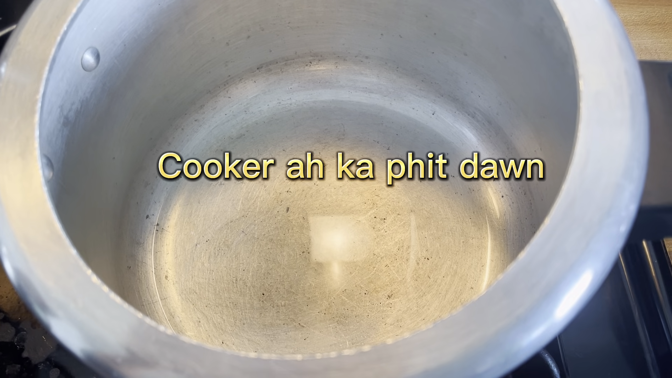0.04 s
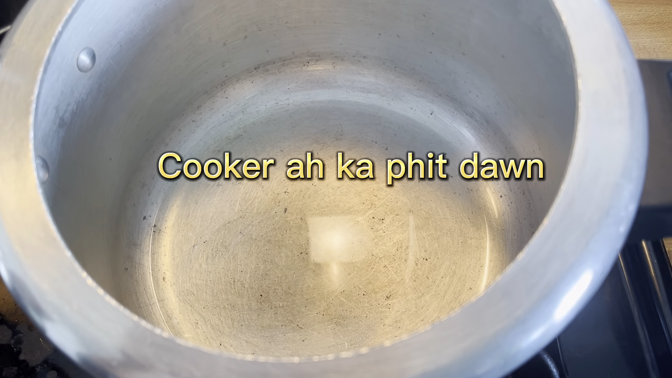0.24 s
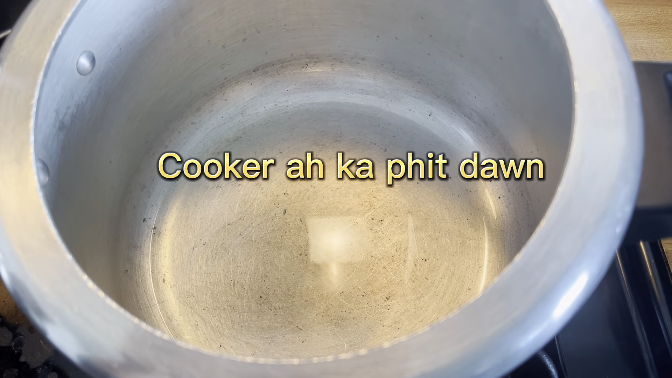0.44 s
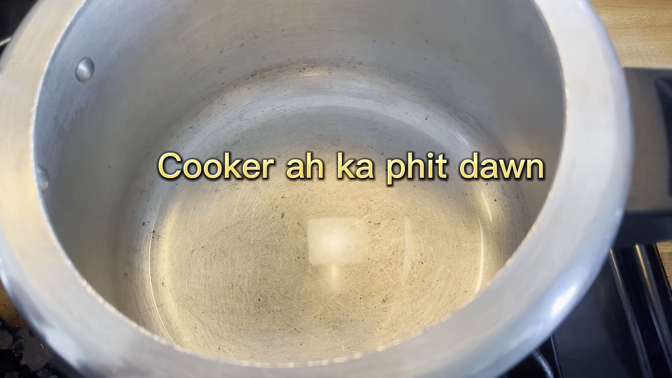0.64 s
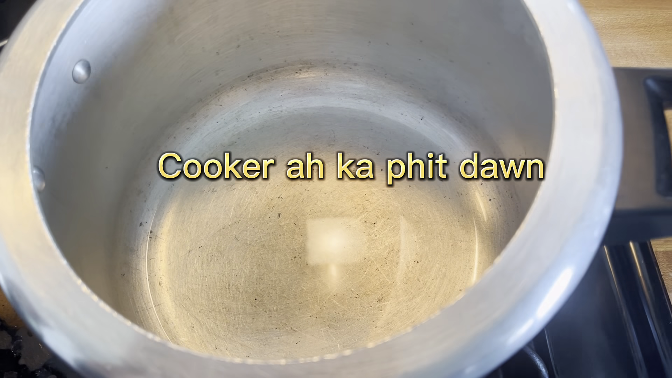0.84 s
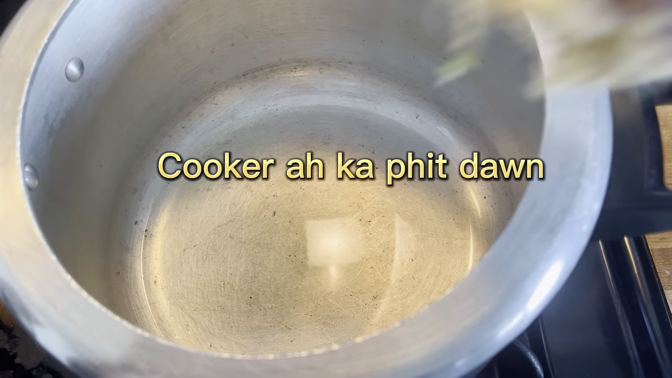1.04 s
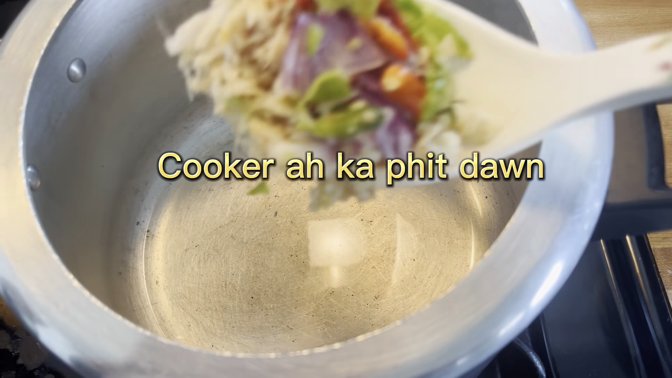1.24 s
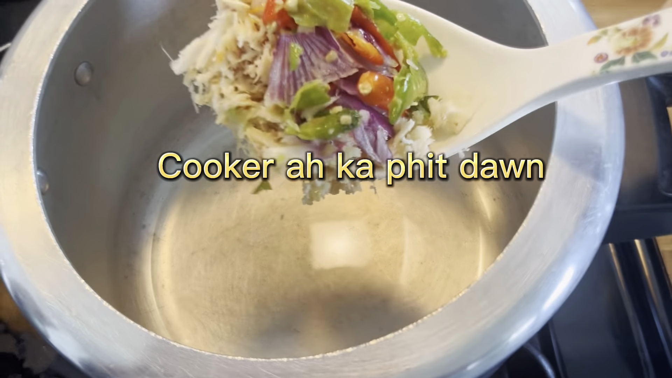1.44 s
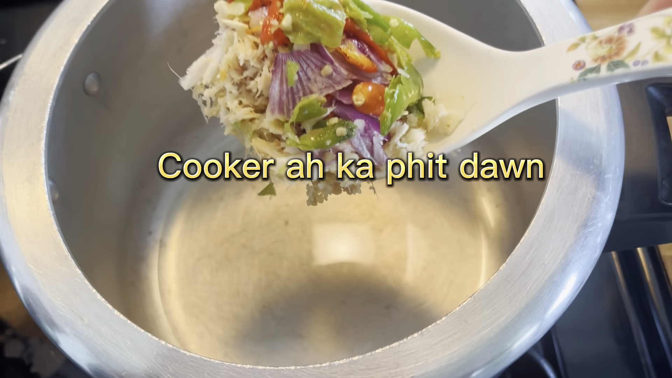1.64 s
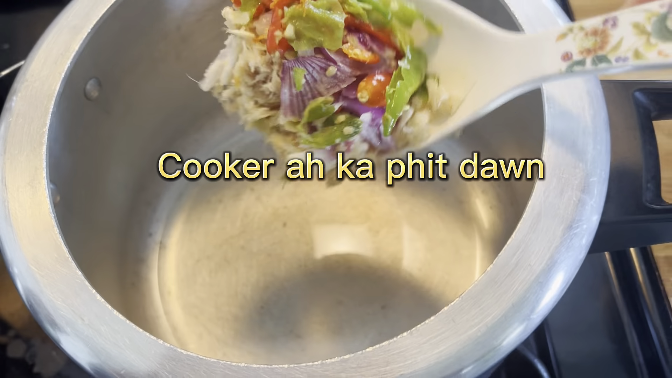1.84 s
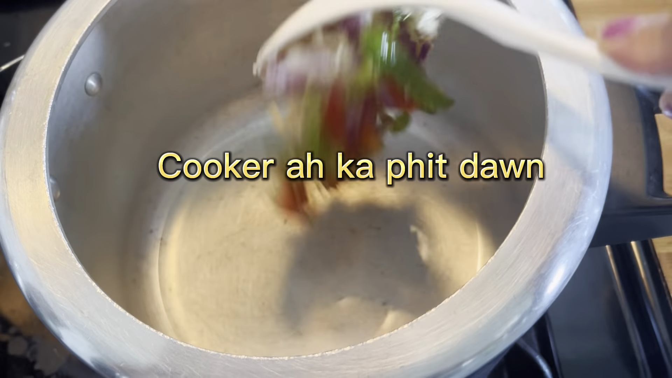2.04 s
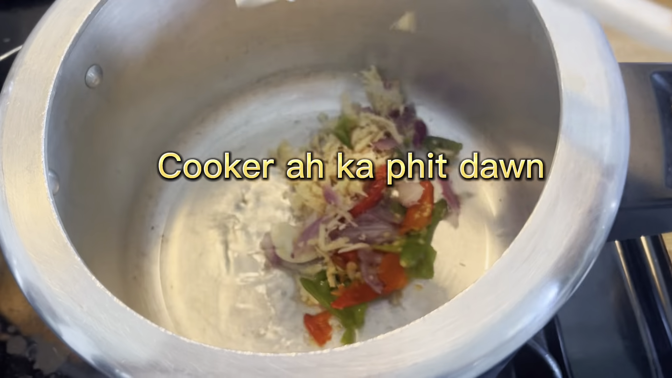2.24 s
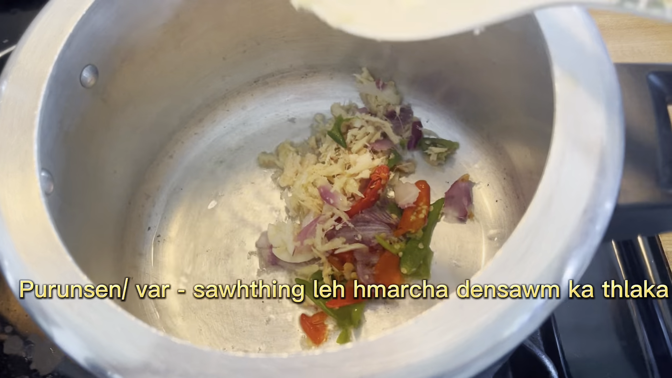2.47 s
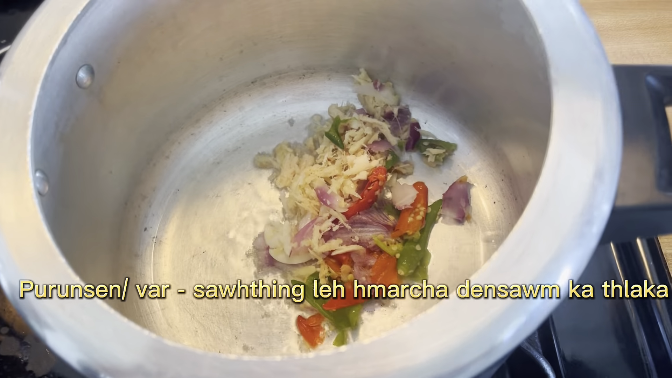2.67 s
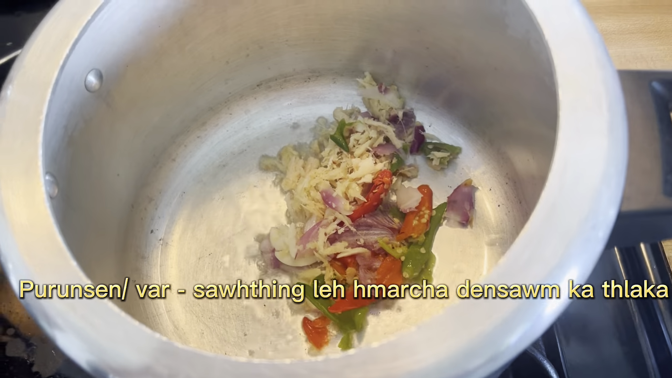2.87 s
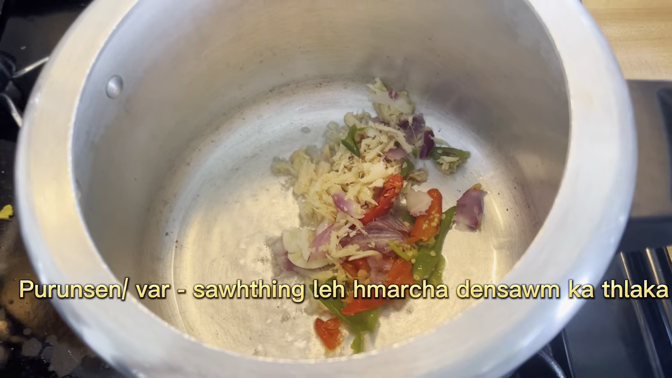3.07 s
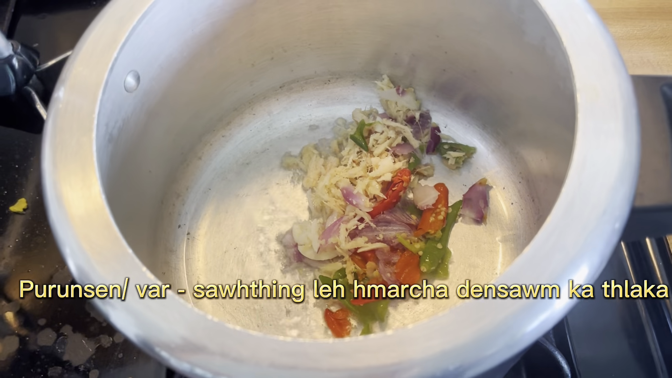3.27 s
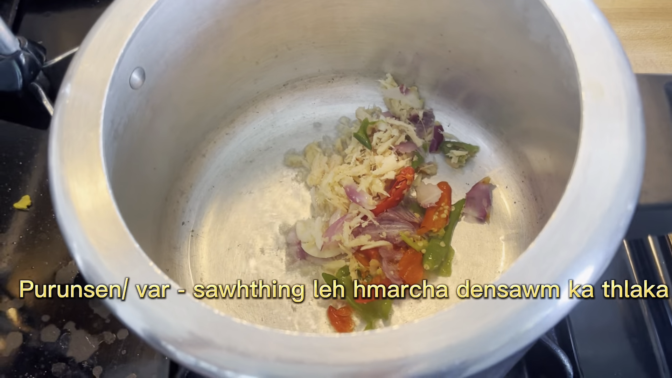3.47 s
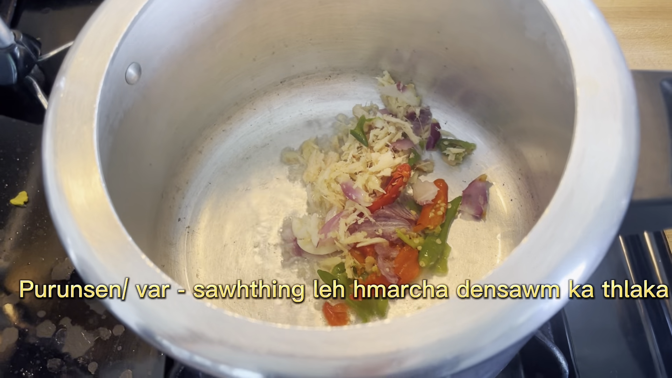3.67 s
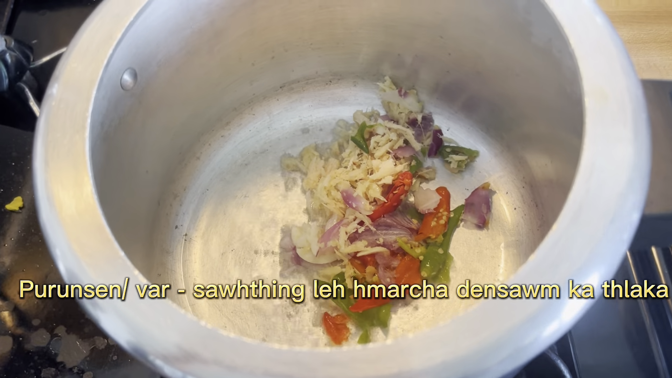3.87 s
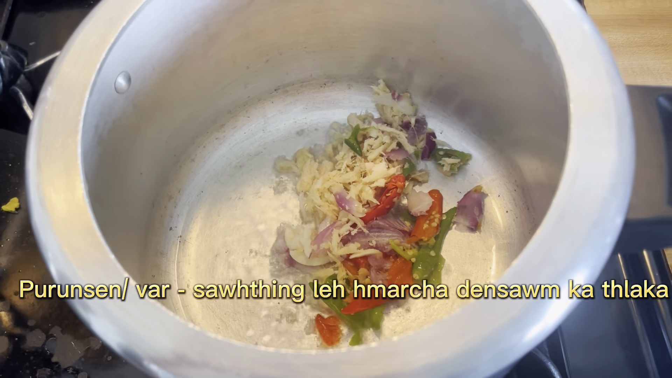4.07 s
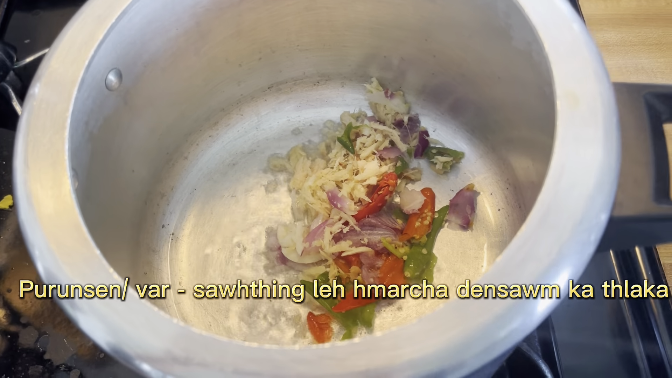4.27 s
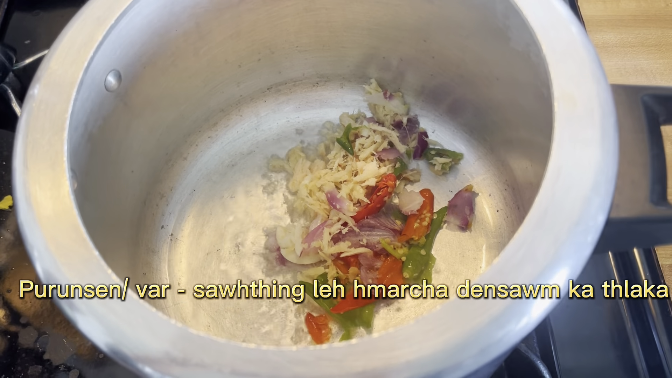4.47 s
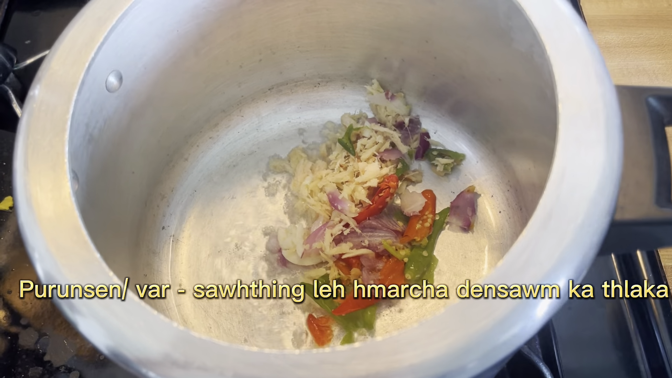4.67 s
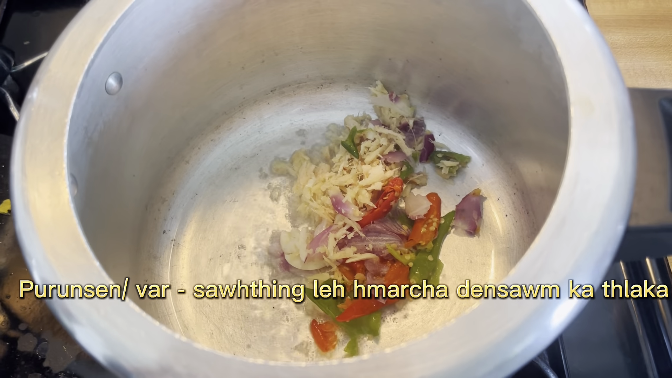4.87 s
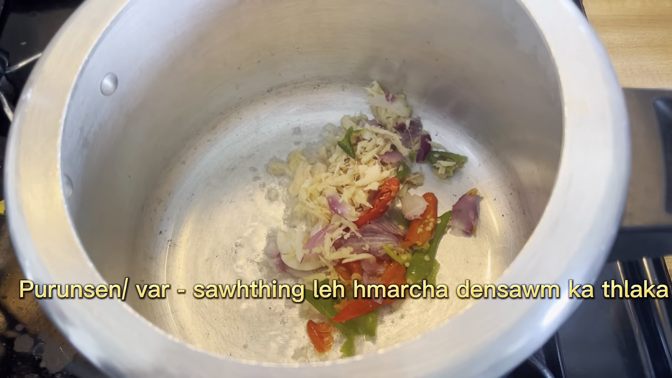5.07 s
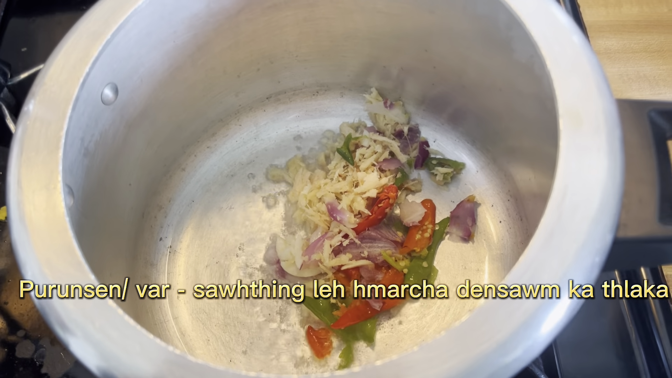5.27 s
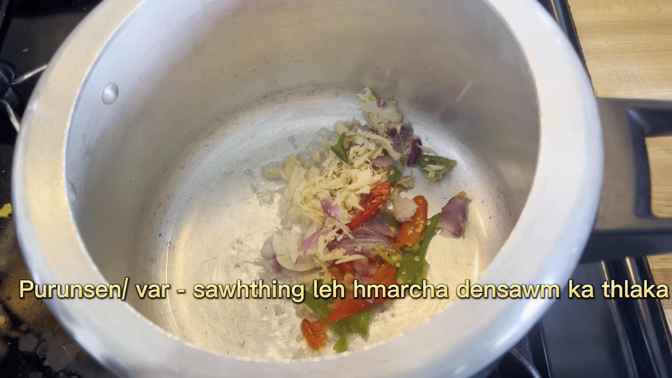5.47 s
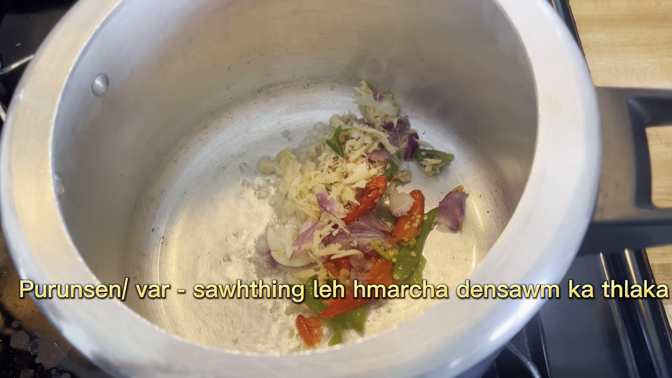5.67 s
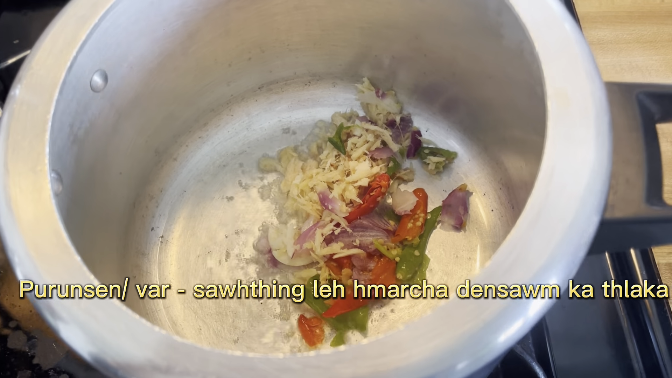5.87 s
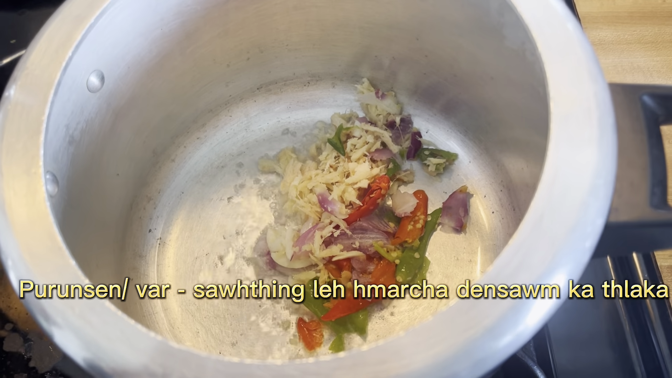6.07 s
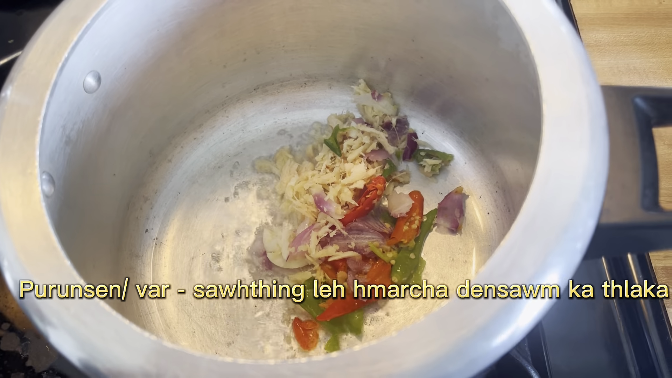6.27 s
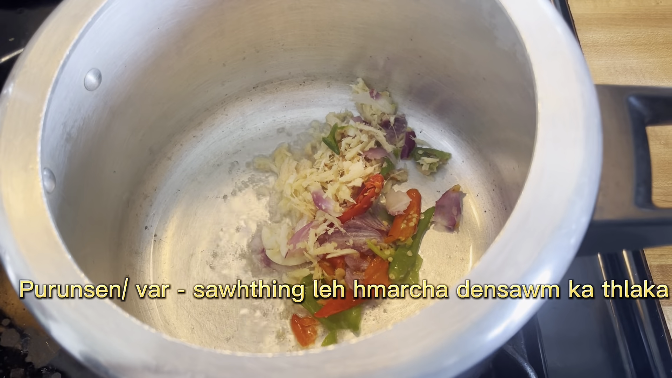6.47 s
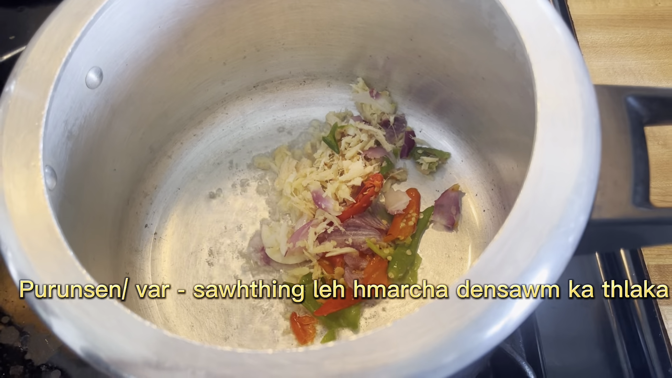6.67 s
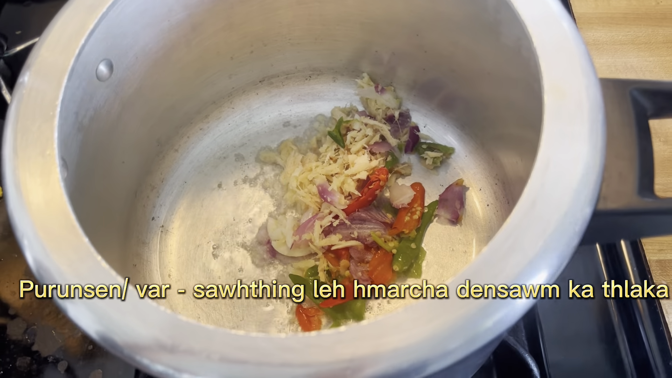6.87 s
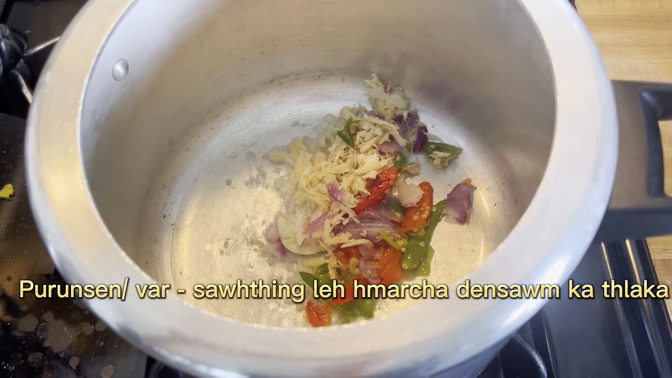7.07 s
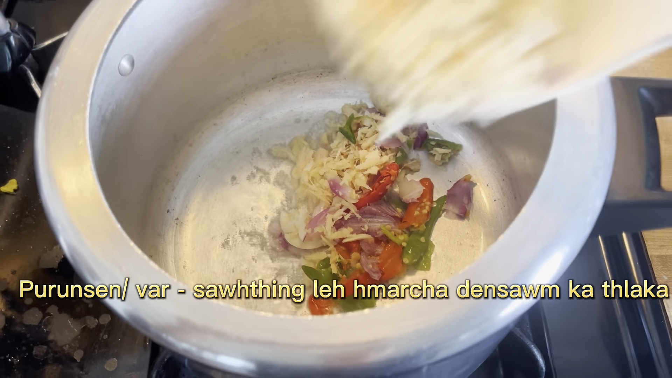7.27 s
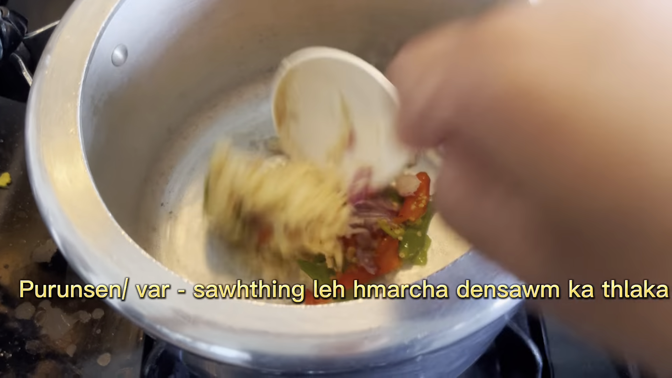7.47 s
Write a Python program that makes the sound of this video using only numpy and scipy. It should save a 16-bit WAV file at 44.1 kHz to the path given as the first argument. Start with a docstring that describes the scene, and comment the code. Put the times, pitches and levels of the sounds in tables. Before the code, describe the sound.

A gas burner roars softly, then chopped vegetables drop into hot oil in a metal pot and sizzle brightly, spitting and popping.

```python
"""Vegetables hit hot oil

A gas burner roars softly under a metal pot of hot oil; something ticks nearby. Chopped vegetables drop in
with a rush of steam and fry: thousands of bubbles burst, spit and pop, and the air in the pot rings with
them. A spoon scrapes now and then. Two close microphone ports hear it, with a shrill peak near 10 kHz."""
import sys
import numpy as np
from scipy import signal
from scipy.fft import rfft, irfft, next_fast_len
from scipy.io import wavfile

SR = 44100
rng = np.random.default_rng(int(sys.argv[2]) if len(sys.argv) > 2 else 0)


def bounce(signal):
    """Save signal as a 16-bit WAV file at the path given by the first command-line argument."""
    frames = np.transpose(np.atleast_2d(signal))
    limited = np.clip(frames, -1, 1)
    pcm = np.round(limited * 32767).astype(np.int16)
    wavfile.write(sys.argv[1], SR, pcm)


N = 331632
SIZE = next_fast_len(N + 8192)
HZ = np.fft.rfftfreq(SIZE, 1 / SR)

# Sizzle envelope, from the moment the food lands: (time [s], fizz above 7 kHz [dB], body 2-7 kHz [dB])
SIZZLE_LEVELS = [(2.0905, -25, -28), (2.099, -22, -24), (2.102, -16, -17.5), (2.132, -15, -18),
                 (2.145, -20, -17.5), (2.18, -16, -16.5), (2.2, -17, -18), (2.56, -20.5, -19.5),
                 (2.63, -17.5, -18.5), (2.672, -18.5, -18.5), (2.69, -21.5, -23), (2.78, -22.5, -23.5),
                 (3.5, -24, -26), (3.76, -24.5, -23.5), (3.89, -20.5, -26.5), (4.05, -23.5, -25),
                 (4.3, -24.5, -26.5), (4.85, -25, -27), (4.95, -23, -24.5), (5.08, -26.5, -26),
                 (6.16, -27, -27.5), (7.2, -27.5, -30), (7.38, -26.5, -31.5), (7.44, -31, -31),
                 (7.478, -32, -31), (7.484, -25, -26), (7.52, -26.5, -25)]
# Tone of the frying: (frequency [Hz], relative level [dB])
SIZZLE_EQ = [(150, -54.5), (400, -22.5), (700, -29), (1400, -22.5), (2000, -21.5), (2750, -18), (3050, -15),
             (3600, -15.5), (5200, -9.5), (7500, -11.5), (9000, -6.5), (10400, 1.5), (11600, -5),
             (12600, -15), (14000, -28), (16000, -26.5)]
# Air modes of the pot, the two lowest first: (frequency [Hz], width [Hz], boost [dB])
POT_MODES = [(447, 38, 13), (1168, 24, 11.5), (3395, 560, 3.5), (4740, 45, 6), (1820, 40, 6.5),
             (2230, 30, 7.5), (2427, 18, 0.5)]
# Featured spits of oil: (time [s], shrill click [dB], body [dB])
OIL_SPITS = [(2.047, -46, -44), (2.059, -35, -42), (2.0685, -36, -46), (2.0815, -31, -40),
             (2.134, -12, -28), (2.1564, -13, -28), (2.2145, -11, -26), (2.2842, -5, -19),
             (2.578, -12, -18), (2.666, -12, -20), (2.8656, -7, -14), (2.9906, -14, -28),
             (3.2374, -17, -23), (3.4523, -8, -17), (3.7758, -8, -28), (3.8922, -5, -24),
             (4.0664, -20, -27), (4.0806, -9, -15), (4.138, -16, -26), (4.2078, -10, -25),
             (4.251, -20, -16), (4.2657, -13, -18), (4.305, -15, -26), (4.3151, -13, -25),
             (4.4443, -8, -23), (4.7745, -12, -28), (4.9326, -14, -25), (4.9514, -15, -23),
             (5.0305, -19, -20), (5.2045, -15, -21), (5.3577, -7, -27), (5.3777, -16, -26),
             (5.3797, -11, -26), (5.4545, -17, -27), (5.4799, -7, -21), (5.4945, -18, -17),
             (5.5493, -12, -28), (5.5688, -3, -25), (5.5784, -9, -27), (5.6745, -13, -28),
             (5.7233, -16, -28), (5.7852, -15, -22), (5.841, -14, -23), (5.8625, -18, -24),
             (5.9129, -17, -24), (5.9695, -12, -23), (6.0396, -16, -27), (6.1094, -16, -21),
             (6.152, -18, -26), (6.2007, -19, -26), (6.2377, -14, -24), (6.263, -17, -26),
             (6.3085, -13, -18), (6.3438, -13, -28), (6.4063, -18, -28), (6.5544, -20, -28),
             (6.6368, -15, -25), (6.7236, -14, -28), (6.784, -9, -25), (6.8158, -17, -26),
             (6.8538, -17, -29), (6.9072, -13, -24), (6.981, -19, -28), (7.0529, -7, -32),
             (7.0767, -18, -28), (7.201, -7, -32), (7.3018, -16, -17), (7.335, -14, -26),
             (7.3408, -12, -22), (7.3826, -6, -32), (7.5172, -12, -18)]
# Food landing, big bubbles and a few sharp, high spits that ring a note: (time [s], note level [dB], pitch
# [Hz], t60 [s], low pot ring [dB])
RINGING_POPS = [(2.092, -34, 864, 0.064, -45), (2.155, -41, 830, 0.059, -53),
                (2.5608, -21, 1980, 0.005, -42), (2.561, -18, 3500, 0.004, -55),
                (2.8652, -4, 7100, 0.0053, -55), (3.356, -23.5, 2460, 0.046, -46),
                (3.431, -28, 2000, 0.0055, -50), (3.452, -27, 1810, 0.0077, -44),
                (3.676, -29, 1800, 0.004, -50), (3.775, -23, 2100, 0.0051, -41),
                (4.076, -17, 1990, 0.0063, -59), (4.08, -17, 2810, 0.006, -40),
                (4.0805, -6, 6800, .005, -55), (4.0915, -24, 2000, .006, -50), (4.152, -7, 5600, 0.005, -31),
                (4.2045, -17.5, 2900, 0.003, -26.5), (4.671, -25, 2550, 0.023, -55),
                (4.932, -27, 3000, 0.0094, -35), (5.546, -11, 4400, 0.003, -54),
                (5.55, -8, 4600, 0.0027, -51), (5.561, -31, 2490, .023, -42),
                (6.3435, -19, 2000, 0.0028, -27), (6.9073, -12.5, 3150, 0.004, -38),
                (6.9075, -23, 1950, 0.005, -55), (7.29, -28, 2800, 0.004, -50),
                (7.333, -33, 2220, 0.008, -38), (7.428, -40, 2500, .004, -34),
                (7.4795, -24, 2390, 0.028, -37)]
# Spoon strokes: (start [s], length [s], attack [s], level [dB], centre [Hz], width [Hz],
# hollow note against the stroke [dB])
SPOON_STROKES = [(4.073, 0.11, 0.005, -35, 2350, 1810, -22), (5.619, 0.073, 0.026, -35.5, 1610, 454, -3),
                 (5.69, 0.054, 0.024, -38, 1780, 600, 1.5), (5.732, 0.088, 0.033, -40, 1730, 800, -4)]
# Ring of the small hard tick: (frequency [Hz], relative level [dB], t60 [s])
TICK_RING = [(856, -13, 0.04), (1000, -4, .012), (1707, -9, 0.035), (1800, -4, .01), (2230, 2, 0.009),
             (2433, -14, 0.05), (2560, 7.5, 0.007), (3350, -14, .02), (3750, -9, 0.012),
             (4870, -2.5, 0.013), (6500, -20, .008)]
# Tone of the flame: (frequency [Hz], relative level [dB])
FLAME_EQ = [(20, -22), (35, -13), (50, -2.5), (128, -1.5), (247, -0.5), (456, -9.5), (840, -12),
            (2100, -34.5), (2710, -36.5), (3410, -38), (4990, -34.5), (7900, -40), (9440, -31),
            (10400, -35.5), (12000, -51), (16000, -111)]
# Hollow resonances in the flame's roar: (frequency [Hz], width [Hz], boost [dB])
FLAME_BANDS = [(55.6, 20, 10), (124.3, 22.4, 9.4), (2735, 94, 23.9), (5070, 210, 15.3), (5840, 260, 14),
               (6700, 330, 13), (9680, 440, 15)]
# Flame envelope: (time [s], level [dB])
FLAME_LEVELS = [(0, -47.5), (2.35, -47.5), (2.7, -55), (7.52, -56)]
# How alike the two ports hear the pot: (frequency [Hz], likeness [0-1])
POT_LIKENESS = [(60, .98), (300, .9), (480, .96), (750, .62), (1400, .62), (2300, .85), (3400, .8),
                (5000, .5), (7200, .5), (8400, .93), (10300, .99), (12300, .93), (13500, .5), (14600, .9)]
# How alike they hear the flame: (frequency [Hz], likeness [0-1])
FLAME_LIKENESS = [(60, .985), (130, .97), (250, .86), (480, .55), (900, .7), (1300, .25), (2700, .75),
                  (3500, .5), (6000, .8), (9500, .93)]
# Phase between the ports: (frequency [Hz], left lead [rad])
PORT_PHASE = [(300, -.15), (900, -.6), (1300, -.6), (1900, .5), (3000, -.7), (7800, -1.1), (8500, 0),
              (9100, .7), (10330, np.pi), (11700, 5.9), (12400, 2 * np.pi), (13800, 3 * np.pi),
              (14400, 4 * np.pi)]
# Balance between the ports: (frequency [Hz], left minus right [dB])
PORT_BALANCE = [(60, -0.5), (110, -0.5), (200, -3), (380, -0.5), (700, -3), (1290, -7), (2380, -3.5),
                (4400, -2.5), (8120, -0.5), (15000, 0.5)]

LANDING_S = SIZZLE_LEVELS[0][0]
FIZZ_SPLIT_HZ = 7000


def frying(pot_tone, bubbles_per_band_s=500):
    """Steam bubbles of many sizes burst at random and ring briefly, in clumps over a dense hiss."""
    spectrum, power = 0, 0
    clumps_db = 1.74 * wobble(29)
    for hz in np.geomspace(500, 13000, num=8):
        smallness = np.log(hz / 200) / np.log(13000 / 200)  # small bubbles vary most in strength
        strength_db = 2.8 * smallness * np.minimum(rng.exponential(1, N), 3)
        strength_db = strength_db + clumps_db + 1.04 * smallness * wobble(41)
        triggers = amp(strength_db) * (rng.random(N) < bubbles_per_band_s / SR) * rng.choice([-1, 1], N)
        bubble = rfft(ring(hz, t60=6 / hz, attack=0.76 / hz), SIZE)
        bubble /= abs(bubble).max()
        spectrum = spectrum + rfft(unit_rms(triggers), SIZE) * bubble
        power = power + abs(bubble) ** 2
    bursts = unit_rms(irfft(spectrum / np.sqrt(power) * pot_tone, SIZE)[:N])
    hiss = unit_rms(filtered(rng.standard_normal((3, N)) * amp(0.25 * clumps_db), pot_tone))
    bursts = np.vstack([bursts, pot_reflections(bursts)])  # strands: shared, left, right
    fizz_db, body_db = envelope(SIZZLE_LEVELS, 1), envelope(SIZZLE_LEVELS, 2)
    # As the fizz calms, single bursts stand out of the hiss.
    burst_share = np.clip(.26 - .033 * (fizz_db + 20), 0, 1)
    texture = np.sqrt(burst_share) * bursts + np.sqrt(1 - burst_share) * hiss
    lows, fizz = crossover(texture, FIZZ_SPLIT_HZ)
    hum, body = crossover(lows, 1900)
    hum_db = -25.5 + 0.2 * (fizz_db + 26)  # the pot's hum only partly follows the fizz
    landed = np.arange(N) / SR > LANDING_S
    sizzle = landed * (amp(hum_db) * hum + amp(body_db) * body + amp(fizz_db) * fizz)
    return ports(sizzle[0], sizzle[1:], POT_LIKENESS)


def spits(pot_tone, small_per_s=22, attack_s=.0003, spray_db=-21, spray_t60=.008):
    """Oil spits in sharp clicks with a tail of spray: small drops are shrill, large ones have body."""
    impulse = irfft(pot_tone, SIZE)[:1500]
    body, shrill = (part / abs(part).max() for part in crossover(impulse, FIZZ_SPLIT_HZ))
    _, shrill = crossover(shrill, 5000)
    shrill *= np.minimum(np.arange(len(shrill)) / SR / attack_s, 1)
    shrill /= abs(shrill).max()
    # Smaller spits fall at random among the featured ones.
    frying_s = N / SR - LANDING_S
    draws = rng.random((round(small_per_s * frying_s), 3))
    small_times = LANDING_S + frying_s * draws[:, 0]
    small_db = [-21, -25] + (2 * draws[:, 1:] - 1) * [4, 8]  # shrill click, body
    out = np.zeros(N)
    for start, shrill_db, body_db in [*OIL_SPITS, *np.column_stack([small_times, small_db])]:
        click = amp(shrill_db) * shrill + amp(body_db) * body
        spray = amp(spray_db - 60 * np.arange(400) / SR / spray_t60) * rng.standard_normal(400)
        spray[0] = 1  # the dry click
        add(out, start + 0.00091, np.convolve(click, spray))
    return out


def pops():
    """Landing food, big bubbles and a few high, ringing spits: a snap, a short note and the ring of the pot's
    two lowest modes."""
    out = np.zeros(N)
    hollow = ring(POT_MODES[0][0], t60=0.055) + .22 * ring(POT_MODES[1][0], t60=0.05)
    for start, db, hz, t60, hollow_db in RINGING_POPS:
        note = ring(hz, max(t60, .002), attack=0.0008)
        snap = ring(hz, t60=4 / hz, attack=.0002)
        snap_db = db + 3 - 4 * np.log2(hz * t60 / 16)  # notes of more cycles get less snap
        add(out, start + 0.00102, amp(db) * note + amp(snap_db) * snap + amp(hollow_db) * hollow)
    return out


def steam_rush(start_s=2.1, length_s=.042, level_db=-27):
    """A short, bright jet of steam sputters as the food lands."""
    count = round(length_s * SR)
    sputter = rng.standard_normal(SR // 4)[:count] * amp(3 * wobble(150)[-count:])
    jet = bandpass(sputter, hz=5300, width_hz=1300)
    out = np.zeros(N)
    add(out, start_s, amp(level_db) * jet * signal.windows.tukey(count, .3))
    return out


def spoon_scrapes(swell_db=9):
    """The spoon slips unevenly, rasping and ringing its hollow note; each stroke swells fast and fades."""
    out = np.zeros(N)
    for start, length, attack, db, hz, width_hz, note_db in SPOON_STROKES:
        t = np.arange(0, length, 1 / SR)
        stroke_db = np.interp(t, [0, attack, length], [db - swell_db, db, db - swell_db])
        grain, force, catch = rng.standard_normal((SR // 4, 3))[:len(t)].T
        slips = grain * (.3 + amp(4 * force) * (catch > 1.8))
        rasp = bandpass(slips, hz, width_hz)
        note = amp(note_db) * bandpass(slips, hz=990, width_hz=140)
        add(out, start, amp(stroke_db) * (rasp + note) * signal.windows.tukey(len(t), .1))
    return out


def tick(start_s=.1616, gain_db=-22.5, room_t60=0.36):
    """A small hard tap rings, and the kitchen answers with a short tail."""
    tap = sum(amp(db) * ring(hz, t60, attack=.0012) for hz, db, t60 in TICK_RING)
    t = np.arange(SR // 4) / SR
    room = 0.011 * rng.standard_normal(len(t)) * amp(-60 * t / room_t60)
    room[0] = 1  # the dry tap
    out = np.zeros(N)
    add(out, start_s, amp(gain_db) * signal.fftconvolve(tap, room))
    return out


def burner(hum_hz=236, waver_hz=.4, hum_db=-7):
    """The bed: a gas flame's softly fluttering roar, with a thin hum wavering inside it."""
    flutter = rng.standard_normal((3, N)) * amp(.8 * wobble(8))  # strands: shared, left, right
    level_db = envelope(FLAME_LEVELS, 1)
    roar = unit_rms(filtered(flutter, resonant_eq(FLAME_EQ, FLAME_BANDS))) * amp(level_db)
    hum = np.sin(2 * np.pi * np.cumsum(hum_hz + waver_hz * wobble(4)) / SR)
    roar[0] += hum * amp(level_db + hum_db + 3 * wobble(2.5))
    return ports(roar[0], roar[1:], FLAME_LIKENESS)


def pot_reflections(x, t60=.009, hop=256):
    """Each port gets its own reflections, ever changing because the sources lie all over the pot."""
    count = N // hop + 2
    blocks = np.pad(x, (hop, (count + 1) * hop - N - hop)).reshape(-1, hop)
    window = np.sin(np.pi * np.arange(2 * hop) / (2 * hop))  # equal-power crossfade
    grains = np.hstack([blocks[:-1], blocks[1:]]) * window
    taps = rng.standard_normal((count, 2, hop)) * amp(-60 * np.arange(hop) / SR / t60)
    taps /= np.linalg.norm(taps, axis=2, keepdims=True)
    echoes = irfft(rfft(grains, 4 * hop)[:, None] * rfft(taps, 4 * hop))
    out = np.zeros((2, count + 2, hop))
    for k in range(3):  # overlap and add
        out[:, k:k + count] += echoes[..., k * hop:(k + 1) * hop].transpose(1, 0, 2)
    return out.reshape(2, -1)[:, hop:N + hop]


def ports(shared, own, likeness, spread=0.88):
    """Stereo image: each port blends the shared sound, at its own phase and level, with its own strand."""
    share = np.clip(over_bins(likeness), 0, 1) ** spread
    side = np.array([[.5], [-.5]])
    phase = np.exp(1j * side * over_bins(PORT_PHASE))
    heard = np.sqrt(share) * phase * rfft(shared, SIZE) + np.sqrt(1 - share) * rfft(own, SIZE)
    return irfft(heard * amp(side * over_bins(PORT_BALANCE)), SIZE)[:, :N]


def resonant_eq(points, peaks):
    """Minimum-phase response of an EQ curve lifted by resonances."""
    lift = 1 + sum(amp(db) ** 2 / (1 + (2 * (HZ - hz) / width) ** 2) for hz, width, db in peaks)
    magnitude = amp(np.maximum(over_bins(points), -100)) * np.sqrt(lift)
    cepstrum = irfft(np.log(magnitude), SIZE)
    cepstrum[1:SIZE // 2] *= 2
    return np.exp(rfft(cepstrum[:SIZE // 2 + 1], SIZE))


def ring(hz, t60, attack=0.0011, length=.15):
    """One decaying mode with a soft attack; times in seconds."""
    t = np.arange(round(length * SR)) / SR
    return np.sin(2 * np.pi * hz * t) * amp(-60 * t / t60) * np.minimum(t / attack, 1)


def wobble(rate_hz):
    """Smooth random modulation at rms 1."""
    lowpass = signal.butter(2, rate_hz, fs=SR, output="sos")
    return unit_rms(signal.sosfilt(lowpass, rng.standard_normal(N)))


def bandpass(x, hz, width_hz):
    """One band of a sound, at rms 1: shifted down, low-passed and shifted back."""
    carrier = np.exp(2j * np.pi * np.cumsum(np.full(len(x), hz)) / SR)
    baseband = signal.lfilter(*signal.butter(2, width_hz / 2, fs=SR), x / carrier)
    return unit_rms((carrier * baseband).real)


def crossover(x, hz):
    """The parts below and above a frequency."""
    low = filtered(x, 1 / (1 + (HZ / hz) ** 4))[..., :x.shape[-1]]
    return low, x - low


def filtered(x, response):
    """Applies a response given at every frequency bin."""
    return irfft(rfft(x, SIZE) * response, SIZE)[..., :N]


def over_bins(points):
    """A frequency table drawn through every bin, on a log axis."""
    hz, value = np.transpose(points)
    return np.interp(np.log(HZ + 1), np.log(hz), value)


def envelope(rows, column):
    """One column of a time table, drawn through every sample."""
    columns = np.transpose(rows)
    return np.interp(np.arange(N) / SR, columns[0], columns[column])


def add(mix, start_s, sound):
    """Drops a sound into the mix."""
    part = mix[round(start_s * SR):][:len(sound)]
    part += sound[:len(part)]


def amp(db):
    """Decibels to gain."""
    return 10 ** (np.asarray(db) / 20)


def unit_rms(x):
    """Scales to rms 1."""
    return x / np.sqrt(np.mean(x ** 2) + 1e-20)


def scene():
    """Sizzle and one-shots over the burner; the one-shots reach both ports more alike than the sizzle."""
    pot_tone = resonant_eq(SIZZLE_EQ, POT_MODES)
    one_shots = spits(pot_tone) + pops() + spoon_scrapes() + tick() + steam_rush()
    sizzle = frying(pot_tone)
    accents = ports(one_shots, pot_reflections(one_shots), POT_LIKENESS, spread=0.45)
    return sizzle + accents + burner()


def record(dry):
    """A steep high cut at 15.8 kHz."""
    high_cut = signal.firwin(511, 15800, window=("kaiser", 9), fs=SR)
    return signal.oaconvolve(dry, high_cut[None], "same")


dry = scene()
out = record(dry)
bounce(out)
```